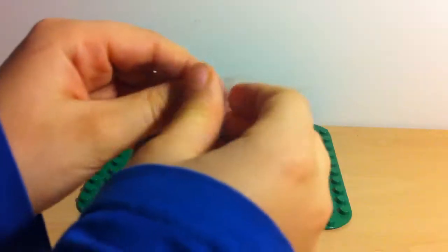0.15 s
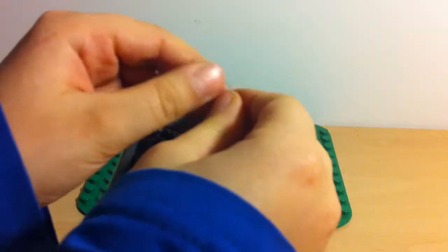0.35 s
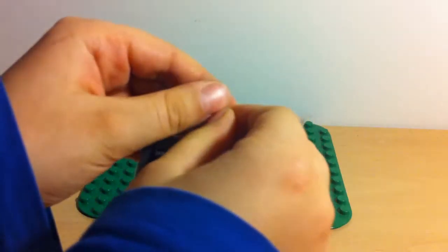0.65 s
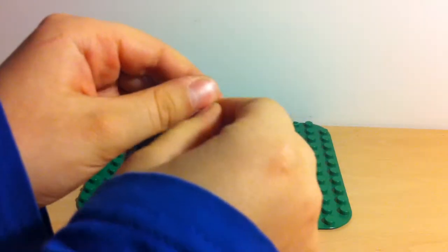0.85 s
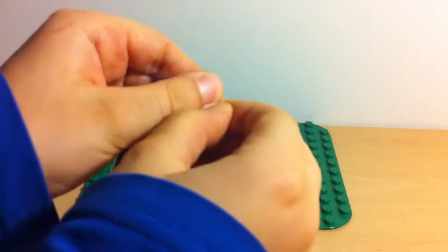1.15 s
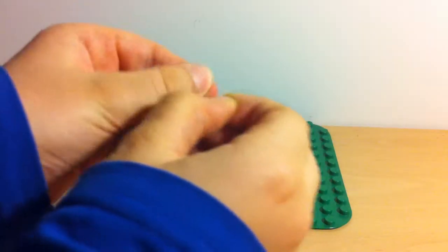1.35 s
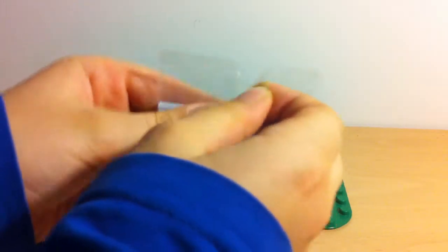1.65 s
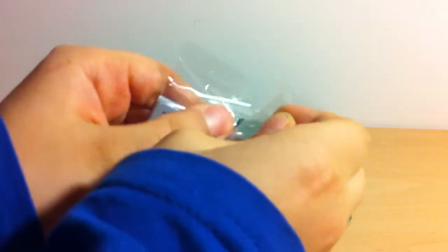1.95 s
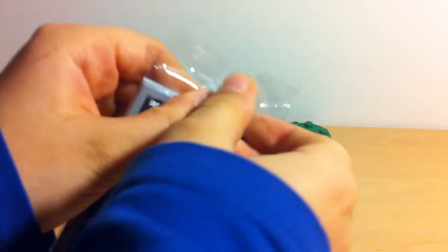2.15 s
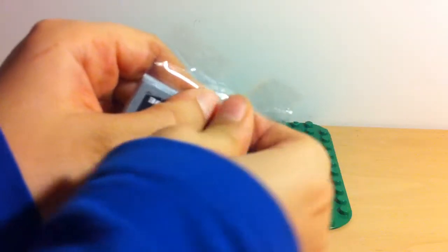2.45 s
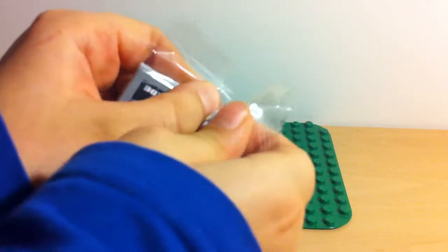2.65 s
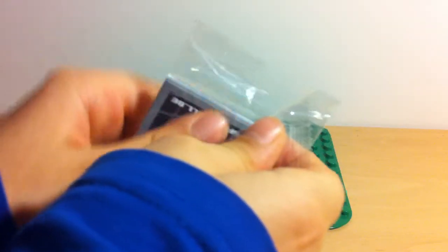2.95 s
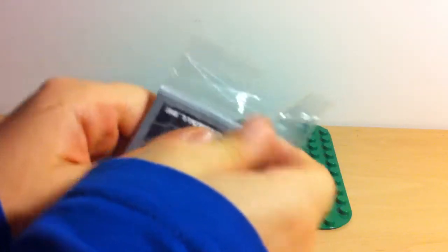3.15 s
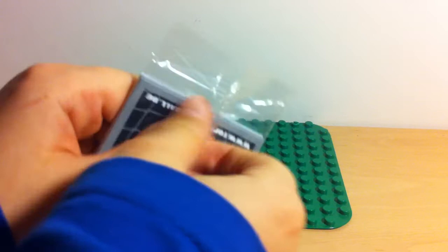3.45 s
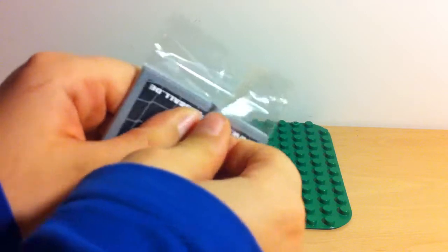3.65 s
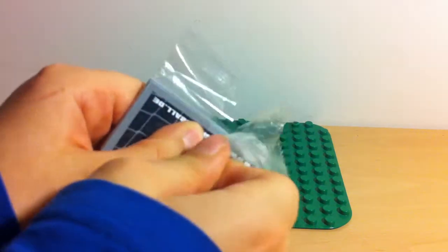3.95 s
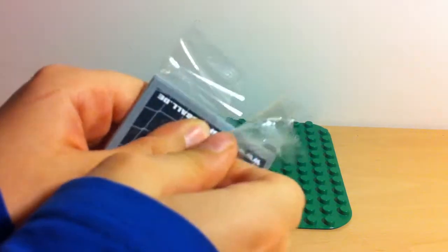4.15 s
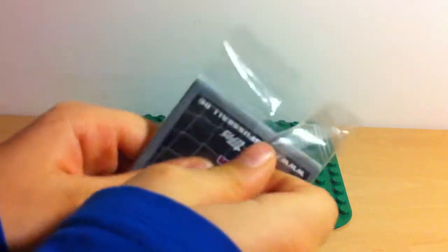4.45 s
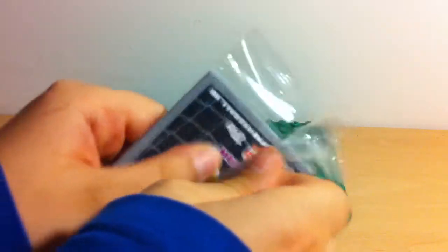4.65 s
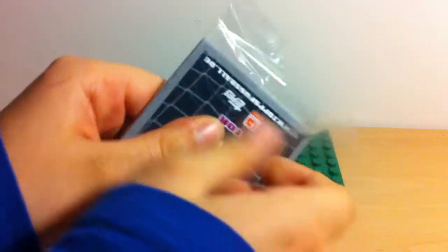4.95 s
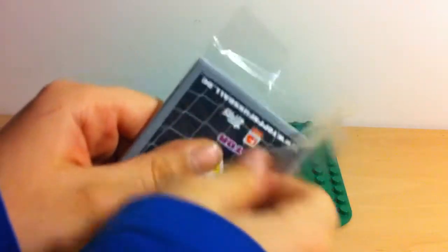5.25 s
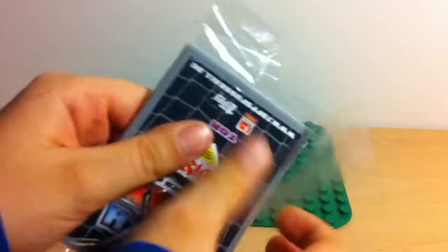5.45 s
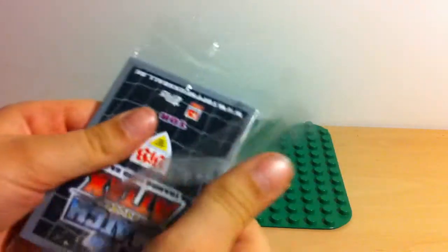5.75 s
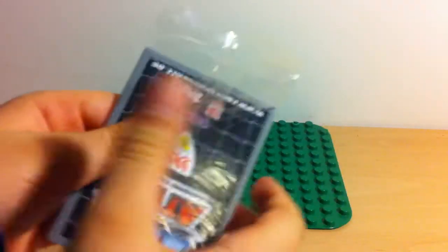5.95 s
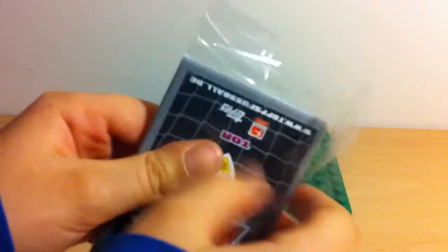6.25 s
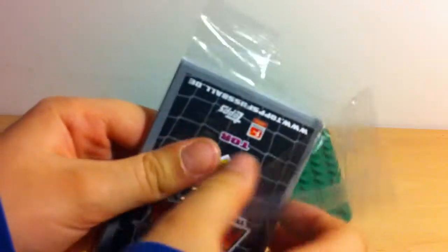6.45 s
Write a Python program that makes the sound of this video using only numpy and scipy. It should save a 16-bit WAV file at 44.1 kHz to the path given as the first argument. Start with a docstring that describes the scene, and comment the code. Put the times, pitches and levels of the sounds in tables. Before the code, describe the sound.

Thin plastic film crinkles close to the microphone as hands peel it off a stack of cards. Sharp, bright snaps stand out from a finer crackle, coming in uneven bursts with brief lulls and growing busiest in the second half. Short hisses of film sliding over card and a few dull bumps through the desk mix in. The small room adds a short echo and faint, steady background noise.

```python
"""Unwrapping a stack of cards

Two hands peel a cellophane wrapper off a stack of cards, close by in a small room.
Big creases buckle with sharp snaps, and tiny ones crackle more as the film is bent.
The film hisses as it slides over card, and dull bumps and rubs come through the desk.
The room adds a short echo and a faint, steady background noise."""
import sys
import numpy as np
from scipy import signal
from scipy.fft import rfft, irfft
from scipy.io import wavfile
from scipy.ndimage import uniform_filter1d

SR = 44100
rng = np.random.default_rng(int(sys.argv[2]) if len(sys.argv) > 2 else 0)


def unload_wav(signal):
    """Save mono or channel-first audio to the path in sys.argv[1] as 16-bit WAV at rate SR, clipped to [-1, 1]."""
    wavfile.write(
        sys.argv[1],
        SR,
        np.round(np.clip(np.atleast_2d(signal).T, -1, 1) * 32767).astype(np.int16),
    )


N = 291942
TIME = np.arange(N) / SR

# Big creases that snap: start_s, level_db, pitch_hz, width_ratio (width / pitch), cards_relative_db
SNAPS = [(.033, -51, 7400, 2.1, -6), (0.1127, -36, 5550, 4.7, -12), (.1536, -38.5, 6740, 0.81, -36),
         (0.18, -36, 2030, 1.8, -17), (0.2207, -36, 6060, 2.2, -24), (.302, -40.5, 6300, 1.1, -24),
         (0.3272, -38.5, 7850, 1.1, -35), (0.358, -36, 8500, 2.2, -33), (0.3955, -32, 8300, 0.56, -28),
         (0.494, -49.5, 3470, 4, -6), (0.587, -42, 4900, 3.1, -5), (.607, -39, 4300, 3.4, -10.5),
         (.7374, -56.5, 2300, 4.7, -6), (.887, -36.5, 10200, 1.15, -18), (.9356, -45.5, 2410, 0.7, -4),
         (1.022, -47.5, 7600, 0.5, -15), (1.147, -48.5, 7900, 1.8, -14), (1.1764, -48, 5500, 1.5, -20),
         (1.2944, -36, 6440, 0.94, -22), (1.332, -34.5, 7200, 1.5, -30), (1.3432, -34.5, 4550, .3, -28),
         (1.359, -35, 3780, 1.7, -28), (1.4055, -37, 5400, 0.26, -31), (1.4809, -44.5, 4000, 2, -4),
         (1.4929, -39, 3970, 2.1, -6), (1.5416, -37.5, 6060, .6, -12), (1.5705, -39.5, 4470, 2.7, -13),
         (1.6016, -41.5, 4300, 3.2, -6.5), (1.6477, -42, 7500, 1.3, -12), (1.661, -44.5, 5300, 2.4, -17),
         (1.6861, -40, 6030, 0.58, -30), (1.786, -40, 5850, 1.9, -11), (1.918, -37.5, 6300, 2.2, -24),
         (1.9223, -24, 4300, 1.4, -26), (1.9654, -35, 4200, 1.1, -10), (2.048, -44.5, 4030, 1.3, -3.5),
         (2.135, -42, 2280, 0.53, -4), (2.2126, -36.5, 6030, 2.5, -9), (2.2267, -41.5, 6000, 2.4, -4),
         (2.2434, -37.5, 7100, 2.1, -26), (2.3254, -48.5, 5800, 1.9, -20), (2.3566, -35, 6840, 1.1, -40),
         (2.4527, -35.5, 7700, 0.93, -35), (2.5, -34, 9900, 0.58, -42), (2.5782, -45.5, 6470, 0.64, -12),
         (2.624, -22, 6900, 0.86, -37), (2.638, -38.5, 5130, 2.7, -22), (2.6483, -32, 8700, 2.1, -16.5),
         (2.6547, -29.5, 4870, 3.6, -11.5), (2.672, -28, 7400, 0.75, -27), (2.785, -40, 8150, 0.21, -53),
         (2.8449, -41.5, 4300, 2, -10), (2.876, -37, 8300, 1.5, -28), (2.8824, -33.5, 7250, 2.1, -22),
         (2.9554, -38, 2830, 1.4, -16.5), (3.056, -34.5, 6650, 2.2, -25), (3.0927, -39.5, 4860, 3, -13.5),
         (3.1036, -34.5, 6000, 3.1, -40), (3.2644, -44, 3960, 0.79, -37), (3.3259, -34, 3860, 1.8, -18),
         (3.3559, -31.5, 6300, 0.61, -25), (3.4206, -41.5, 5500, 1.3, -18), (3.4967, -44.5, 12400, .4, -15),
         (3.55, -38.5, 7900, 0.67, -11), (3.605, -34, 5350, 1.75, -18), (3.8996, -45.5, 2840, 2, -43),
         (3.9293, -53, 2480, 1.7, -25), (3.9713, -48, 5760, 3.2, -14), (4.0092, -40, 3400, 3.1, -6),
         (4.021, -35, 3840, 0.74, -10), (4.0369, -33, 6000, 1.7, -37), (4.0415, -28, 3280, 0.66, -7),
         (4.0944, -39, 2900, 1.2, -24), (4.134, -37, 3740, .25, -38), (4.2117, -46.5, 10200, 1.1, -24),
         (4.2752, -47, 4900, 2.2, -24), (4.3075, -41.5, 4430, 1.6, -12), (4.3213, -42, 4200, 2.6, -21),
         (4.3318, -37.5, 3480, 0.13, -11), (4.356, -39, 6300, 2.1, -10.5), (4.364, -36.5, 6260, 2.5, -40),
         (4.397, -31, 7950, 1.8, -43), (4.4033, -46, 5500, 1.6, -21), (4.514, -42, 5040, 2.9, -22),
         (4.545, -39.5, 4900, .3, -21), (4.596, -47, 4350, 0.81, -26), (4.6604, -46, 3450, 1.1, -30),
         (4.695, -36, 2800, 1.8, -14.5), (4.703, -35.5, 4900, .9, -36), (4.7175, -31.5, 3900, 0.52, -41),
         (4.7671, -24, 4270, 2.7, -28), (4.788, -36.5, 2230, 1.6, -7), (4.82, -31.5, 3020, 1.8, -6.5),
         (4.832, -32, 5800, 2.2, -21), (4.8531, -29, 5670, 2.7, -5), (4.8573, -27, 5800, 0.88, -42),
         (4.891, -35.5, 2270, 1, -26), (4.901, -36, 6350, 1.4, -19), (4.9112, -35.5, 5800, 2.5, -26),
         (5.0002, -37.5, 3770, .8, -16), (5.0075, -40.5, 3700, 2.4, -8), (5.024, -33.5, 4930, 3.7, -9.5),
         (5.0461, -37, 1960, 0.69, -8), (5.0586, -35, 6100, 2.2, -22), (5.0697, -37.5, 4900, 3.2, -25),
         (5.1016, -39, 4500, 1.9, -15), (5.1169, -33, 6700, 1.3, -28), (5.1214, -37.5, 6800, 2.1, -35),
         (5.2467, -35, 12200, 1.2, -16.5), (5.355, -46, 6040, 0.82, -37), (5.4012, -39.5, 6340, 1.5, -19),
         (5.4302, -31.5, 4000, 1.4, -24), (5.4422, -33, 5500, 2.6, -10.5), (5.4696, -35, 5800, 2.7, -11),
         (5.4835, -21.5, 4000, 2.2, -6.5), (5.4894, -36.5, 4900, 3.2, -9), (5.505, -33.5, 5840, 2.5, -5),
         (5.5263, -34.5, 4900, 3, -33), (5.538, -35, 5800, 3.2, -11), (5.5484, -31.5, 1820, 0.35, -12),
         (5.5872, -39.5, 3400, 3.6, -16), (5.6126, -33.5, 8440, 0.7, -13.5),
         (5.623, -39.5, 2900, 0.62, -14), (5.7254, -42, 3150, 2.2, -7), (5.845, -45, 11500, 1.3, -36),
         (5.9329, -40, 5800, 3, -24), (6.158, -47, 4400, 1, -13), (6.1924, -46, 6140, 1, -27),
         (6.2631, -43, 5800, 2.4, -12), (6.2824, -34.5, 3400, 0.64, -33), (6.317, -30.5, 3600, 0.47, -27),
         (6.386, -35, 4200, 3.2, -18), (6.4011, -23.5, 4700, 2.4, -11.5), (6.569, -27.5, 6850, 2.2, -17.5)]
# Fingers bending the film: peak_s, strength_db, rise_s, fall_s, treble_relative_db, cards_relative_db
BENDS = [(0.136, -55.5, 0.029, 0.07, 7.5, 1.5), (0.312, -54.5, .02, 0.051, 0, -6),
         (0.506, -56.5, 0.0134, 0.027, 2, -2), (.615, -72, 0.0079, .025, 16, -16),
         (.94, -54.5, 0.015, 0.041, -2, -19), (1.233, -50, 0.0068, 0.013, 0.5, 1),
         (1.315, -45, 0.013, 0.041, 7, 1.5), (1.484, -55.5, 0.014, 0.034, 5.5, -3),
         (1.572, -47.5, 0.033, 0.013, -1, -3), (1.669, -58, 0.029, 0.059, 6.5, -7),
         (1.85, -56, 0.1, 0.11, 3, -3.5), (1.935, -51, 0.023, 0.094, 4.5, -4.5),
         (2.213, -46, 0.021, 0.021, 6, -8), (2.399, -51.5, 0.012, 0.035, 0, -5.5),
         (2.634, -39, 0.0086, 0.023, 1.5, -7.5), (2.88, -53.5, 0.11, 0.069, 1.5, -8.5),
         (3.079, -54.5, 0.029, 0.035, 7, -13), (3.349, -44.5, 0.059, 0.038, 1.5, -8),
         (3.518, -53.5, 0.022, .025, -5, -2.5), (3.601, -50, 0.0052, 0.017, -1, -7),
         (3.95, -63, 0.013, 0.05, 5, -17), (4.015, -39.5, 0.0044, 0.026, 1, -9),
         (4.337, -47.5, .012, 0.061, 1, -10), (4.6, -58.5, 0.14, 0.044, 0.5, -12),
         (4.708, -43, 0.0038, .008, 2, -8), (4.796, -36.5, 0.0063, 0.046, -1, -6),
         (4.863, -38, 0.023, 0.027, 4.5, 3.5), (5.05, -42.5, 0.031, 0.03, 2.5, -0.5),
         (5.11, -47, 0.0059, 0.013, 7.5, -19), (5.3, -61.5, 0.15, 0.12, 4, -14),
         (5.488, -38, 0.055, 0.019, -0.5, -8), (5.7, -57, 0.058, 0.16, 3.5, -4),
         (6.03, -50, .016, .028, 3, -12), (6.19, -60, 0.14, 0.071, 4.5, -5),
         (6.392, -44.5, 0.038, 0.019, 8.5, -6.5), (6.57, -52, 0.063, 0.027, 0, -2.5)]
# The overall tone of the film: frequency_hz, gain_db
FILM_TONE = [(300, -7.5), (1000, -3.5), (1500, 1), (2100, 4), (2700, 2.5), (8000, 2.5), (11000, 1.5),
             (16000, 2)]
# The ways the stack of cards rings in the hand: pitch_hz, width_hz, gain_db
CARD_MODES = [(202, 170, -9.5), (432, 130, -1.5), (593, 84, 5.5), (721, 230, 3), (1503, 880, -7.5)]
# Film sliding over card: peak_s, level_db, pitch_hz, rise_s, fall_s
SLIDES = [(.425, -55.5, 1840, 0.026, 0.045), (1.232, -53.5, 3400, 0.0063, 0.036),
          (1.962, -54, 3200, 0.013, 0.04), (2.09, -57.5, 1290, 0.078, 0.023),
          (2.207, -52, 2470, 0.021, 0.026), (4.114, -71, 3570, 0.041, 0.035),
          (4.851, -47, 2070, 0.027, 0.029), (5.506, -49, 1950, 0.022, 0.024),
          (6.366, -42, 4400, 0.015, 0.031), (6.388, -33, 3480, 0.0058, 0.01)]
# Bumps and rubs on the desk: peak_s, level_db, pitch_hz, rise_s, fall_s
BUMPS = [(.28, -56, 390, 0.023, 0.032), (.33, -54.5, 302, 0.021, 0.027), (.44, -52, 302, 0.028, 0.062),
         (0.983, -56, 234, 0.011, 0.05), (1.228, -33.5, 407, 0.0032, 0.036), (1.3, -49, 214, 0.049, 0.047),
         (1.834, -47.5, 400, 0.0047, 0.046), (1.97, -55.5, 408, 0.0087, 0.079),
         (2.093, -40, 400, 0.0026, 0.032), (2.138, -44, 303, 0.023, 0.058),
         (2.227, -52.5, 150, 0.0051, 0.036), (2.478, -50, 477, 0.003, 0.027),
         (2.603, -55.5, 234, 0.024, 0.08), (3.625, -60.5, 223, 0.04, 0.057),
         (4.041, -48, 385, 0.0017, 0.021), (4.808, -49, 313, 0.018, 0.067),
         (5.484, -37, 447, 0.0025, 0.012), (5.858, -56, 485, 0.012, 0.017), (5.94, -57, 443, .006, 0.037),
         (6.035, -51.5, 434, 0.0031, 0.012), (6.402, -40.5, 382, 0.01, 0.0099),
         (6.553, -47.5, 567, 0.0032, 0.012)]
# The low pitches at which the dull bumps ring in the room: pitch_hz, width_hz, gain_db
BUMP_MODES = [(107, 440, -7.5), (171, 64, 6.5), (333.5, 41, 2.5), (430, 34, 7.5), (451, 71, 4),
              (556, 47, 3), (621, 42, 3.5), (780, 210, -1.5)]
# Early echoes from desk, hands and wall: delay_s, gain_db
ECHOES = [(.0034, -44), (.0058, -21)]
# The room's fading tail, band by band: centre_hz, fade_s (time to drop 60 dB), gain_db
ROOM_TAIL = [(246, 0.58, -28), (653, 0.26, -12.5), (1740, 0.51, -15.5), (5270, 0.35, -12.5),
             (11000, 0.24, -20)]
# The tone of the room's steady noise: frequency_hz, gain_db
BACKGROUND_TONE = [(15, 6), (25, -4.5), (55, -17), (108, -2), (277, 1), (326, 4), (1100, -6), (1520, -10),
                   (1940, -6.5), (6210, -11.5), (10400, -18), (14800, -15), (16000, -8)]


def snaps(cards_db=-1, snap_s=.003):
    """Big creases buckle one by one, and the cards take some of each blow."""
    out = np.zeros(N)
    for start_s, level_db, pitch_hz, width_ratio, cards_relative_db in SNAPS:
        flutter_share = .47 + .004 * (-21 - level_db)  # harder snaps flip more cleanly
        flutter_s = 0.014 * (4750 / pitch_hz) ** 0.22  # smaller, brighter patches stop sooner
        push, patch = crease(pitch_hz, width_ratio, flutter_share, flutter_s)
        film = unit_energy(shape_tone(patch, FILM_TONE))
        cards = gain(cards_relative_db + cards_db) * unit_energy(ring(push, CARD_MODES))
        # the level counts as if all the energy fell within snap_s
        add(out, start_s, gain(level_db) * np.sqrt(snap_s * SR) * (film + cards))
    return out


def crease(pitch_hz, width_ratio, flutter_share, flutter_s=0.025, click_db=-17, damping_hz=500):
    """A crease flips, then flutters. Returns that push and the patch of film ringing from it."""
    t = np.arange(900) / SR
    flutter_share = np.clip(flutter_share, .03, .95)
    flutter = rng.standard_normal(len(t)) * np.exp(-np.log(1000) * t / flutter_s)
    push = np.sqrt(flutter_share) * unit_energy(flutter)
    push[0] += np.sqrt(1 - flutter_share)  # the flip takes the rest of the energy
    width_hz = width_ratio * pitch_hz + damping_hz  # the fingers damp every ring
    return push, resonate_twice(push, pitch_hz, width_hz) + gain(click_db) * push


def crackle(rustle_db=-6, film_db=-2, cards_db=-3, split_hz=6000):
    """Tiny creases tick and layers of film brush together, louder as the film is bent."""
    bend_db, treble_relative_db, cards_relative_db = bending()
    ticks = steady(tiny_creases(bend_db), 0.077)
    rustle = gain(rustle_db) * rng.standard_normal(N)
    pushes = ticks + rustle
    film = shape_tone(pushes, FILM_TONE)
    low = signal.sosfilt(signal.butter(3, split_hz, "low", fs=SR, output="sos"), film)
    high = signal.sosfilt(signal.butter(3, split_hz, "high", fs=SR, output="sos"), film)
    wrapper = steady(low, 0.23) + steady(high, 0.045) * gain(treble_relative_db)
    cards = steady(ring(pushes, CARD_MODES), 0.21) * gain(cards_relative_db)
    return (gain(film_db) * wrapper + gain(cards_db) * cards) * gain(bend_db)


def tiny_creases(bend_db, usual_per_s=420, sliding_per_s=4000, tenfold_db=45, scatter_db=9.0):
    """Tiny creases give way at random, more often the harder the film is bent."""
    # while the film slides, its ticks crowd together into a swish
    sliding = sum(swell(1, peak_s, rise_s, fall_s) for peak_s, _, _, rise_s, fall_s in SLIDES)
    ticks_per_s = usual_per_s * 10 ** ((bend_db - np.median(bend_db)) / tenfold_db)
    ticks_per_s += sliding_per_s * sliding
    patches = [unit_energy(crease(pitch_hz, rng.uniform(1, 2.33), flutter_share=0.49)[1])
               for pitch_hz in np.geomspace(2000, 11000, 120)]
    which = rng.integers(len(patches), size=N)
    strength = gain(scatter_db * rng.standard_normal(N)) * rng.choice([-1, 1], N)
    ticks = np.zeros(N)
    for i in np.flatnonzero(rng.random(N) < ticks_per_s / SR):
        add(ticks, i / SR, strength[i] / np.sqrt(ticks_per_s[i]) * patches[which[i]])
    return ticks


def bending(held_db=-72.5):
    """Bends build up and relax. Returns dB of the film, and of treble and cards relative to it."""
    film, treble, cards = np.full((3, N), gain(held_db) ** 2)  # even held film crackles a little
    for peak_s, strength_db, rise_s, fall_s, treble_relative_db, cards_relative_db in BENDS:
        power = swell(gain(strength_db), peak_s, rise_s, fall_s) ** 2
        film += power
        treble += power * gain(treble_relative_db) ** 2
        cards += power * gain(cards_relative_db) ** 2
    return 10 * np.log10([film, treble / film, cards / film])


def slides(width_ratio=.5):
    """Film drags over card in slips so close together that they merge into a short hiss."""
    out = np.zeros(N)
    for peak_s, level_db, pitch_hz, rise_s, fall_s in SLIDES:
        hiss = resonate_twice(rng.standard_normal(N), pitch_hz, width_ratio * pitch_hz)
        out += swell(set_level(hiss, level_db), peak_s, rise_s, fall_s)
    return out


def bumps(cutoff_hz=950):
    """Soft pushes make dull bumps and rubs, each with its own pitch and loudness."""
    out = np.zeros(N)
    ringing = ring(rng.standard_normal(N), BUMP_MODES)
    rumble = signal.sosfilt(signal.butter(4, cutoff_hz, fs=SR, output="sos"), ringing)
    for peak_s, level_db, pitch_hz, rise_s, fall_s in BUMPS:
        shifted = np.roll(rumble, rng.integers(N))  # so no two bumps are alike
        shake = resonate_twice(shifted, pitch_hz, width_hz=pitch_hz)
        out += gain(level_db) * swell(steady(shake, 0.027), peak_s, rise_s, fall_s)
    return out


def room(sound, build_s=0.0023):
    """Nearby surfaces send back early echoes, then many more blur into a short tail."""
    t = TIME[:SR // 2]
    build_up = 1 - np.exp(-t / build_s)
    response = np.zeros(len(t))
    for centre_hz, fade_s, gain_db in ROOM_TAIL:
        tail = rng.standard_normal(len(t)) * np.exp(-np.log(1000) * t / fade_s) * build_up
        response += gain(gain_db) * resonate(unit_energy(tail), centre_hz, width_hz=centre_hz)
    for delay_s, gain_db in ECHOES:
        response[int(delay_s * SR)] += gain(gain_db)
    return sound + signal.fftconvolve(sound, response)[:N]


def background(level_db=-66):
    """The faint, steady noise of the room."""
    return set_level(shape_tone(rng.standard_normal(N), BACKGROUND_TONE), level_db)


def gain(db):
    """Turn decibels into a number to multiply by."""
    return 10 ** (np.asarray(db) / 20)


def unit_energy(x):
    """Scale a sound to an energy of one."""
    return x / np.sqrt(np.sum(x ** 2) + 1e-18)


def set_level(x, db):
    """Scale a sound to an average (rms) level."""
    return unit_energy(x) * np.sqrt(len(x)) * gain(db)


def resonate(x, pitch_hz, width_hz):
    """Keep the sound near one pitch; a narrower band rings longer."""
    sharpness = pitch_hz / min(width_hz, .3 * SR)
    return signal.lfilter(*signal.iirpeak(pitch_hz, sharpness, fs=SR), x)


def resonate_twice(x, pitch_hz, width_hz):
    """Two passes cut far-off pitches more strongly."""
    return resonate(resonate(x, pitch_hz, width_hz), pitch_hz, width_hz)


def ring(x, modes):
    """Ring at several pitches at once, neighbours swinging opposite ways."""
    return sum((-1) ** k * gain(gain_db) * resonate(x, pitch_hz, width_hz)
               for k, (pitch_hz, width_hz, gain_db) in enumerate(modes))


def shape_tone(x, points, size=2048):
    """Turn frequencies up or down along a curve."""
    hz, db = np.transpose(points)
    bins_hz = np.maximum(np.fft.rfftfreq(size, 1 / SR), 1)
    curve_db = np.interp(np.log(bins_hz), np.log(hz), db)
    # fold the filter so that it never rings before the sound arrives
    cepstrum = irfft(np.log(gain(curve_db)))
    cepstrum[1:size // 2] *= 2
    cepstrum[size // 2 + 1:] = 0
    response = irfft(np.exp(rfft(cepstrum)))
    return signal.fftconvolve(x, response)[:len(x)]


def add(out, start_s, x):
    """Mix in a short sound at a given time."""
    i = int(np.clip(start_s * SR, 0, N - 1))
    out[i:i + len(x)] += x[:N - i]


def swell(x, peak_s, rise_s, fall_s):
    """Grow to a peak, then die away."""
    late_s = TIME - peak_s
    log_gain = np.minimum(late_s / rise_s, -late_s / fall_s)
    return x * np.exp(np.maximum(log_gain, -20))


def steady(x, span_s):
    """Even out loudness changes slower than span_s, keeping the finer grain."""
    power = uniform_filter1d(x ** 2, max(int(span_s * SR), 2))
    return x / np.sqrt(np.abs(power) + np.mean(x ** 2) / 20)


def scene():
    """Wrapper, cards and bumps in the room, over its faint background, in one channel."""
    room_noise = background()
    handling = snaps() + crackle() + slides() + bumps()
    return (room(handling) + room_noise)[None]


def record(dry):
    """Cut away the highest treble."""
    cutoff_hz = 15900
    return signal.sosfilt(signal.ellip(8, .2, 70, cutoff_hz, fs=SR, output="sos"), dry)


dry = scene()
out = record(dry)
unload_wav(out)
```